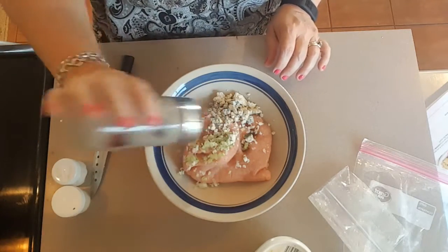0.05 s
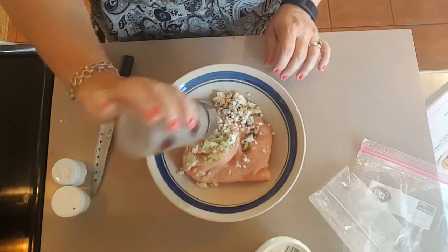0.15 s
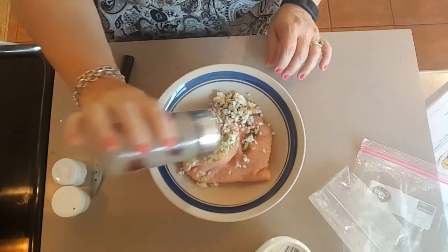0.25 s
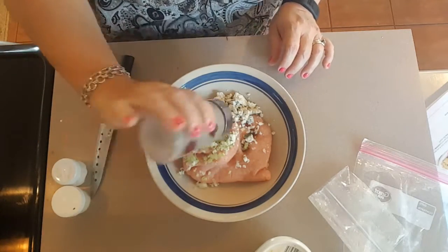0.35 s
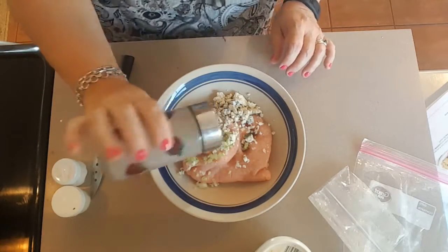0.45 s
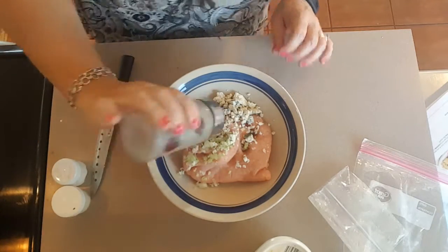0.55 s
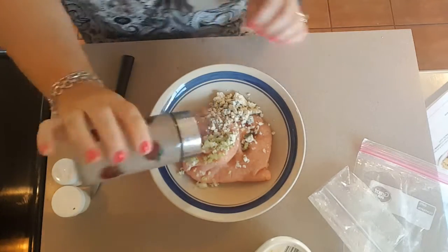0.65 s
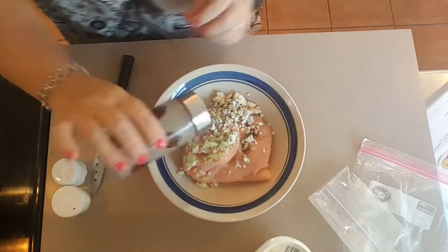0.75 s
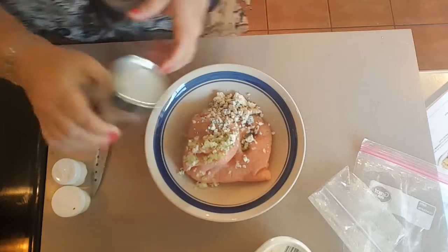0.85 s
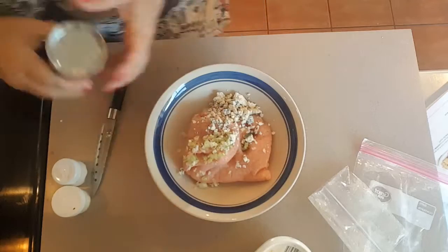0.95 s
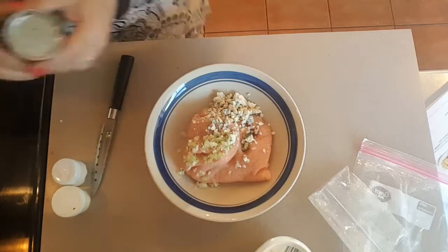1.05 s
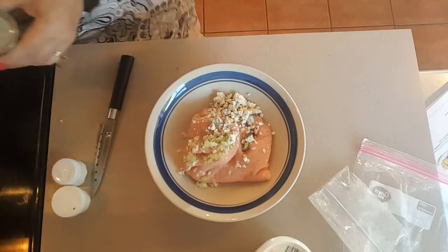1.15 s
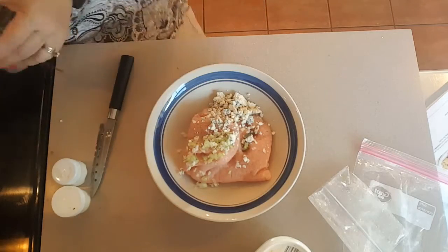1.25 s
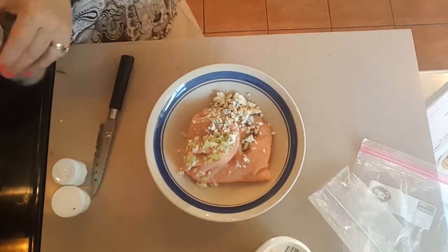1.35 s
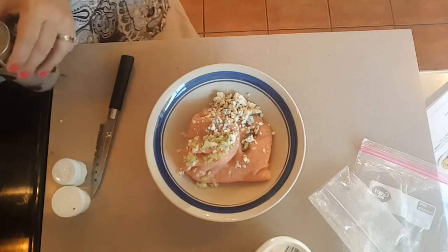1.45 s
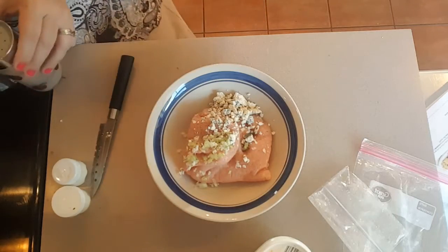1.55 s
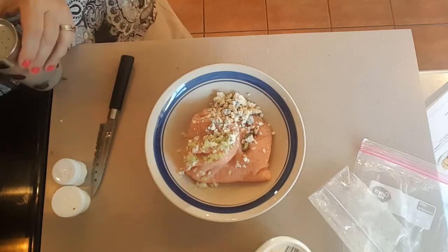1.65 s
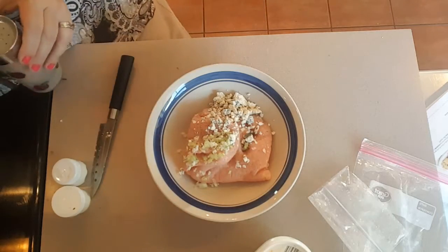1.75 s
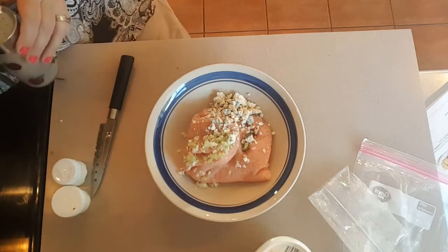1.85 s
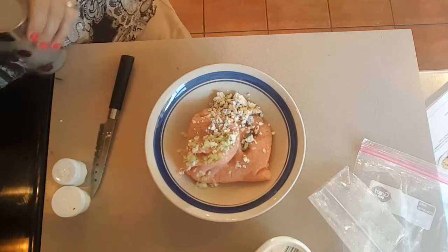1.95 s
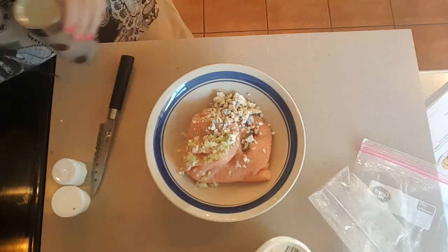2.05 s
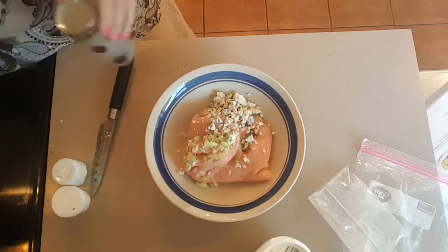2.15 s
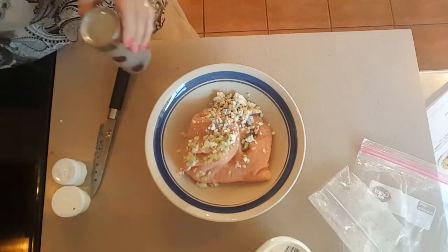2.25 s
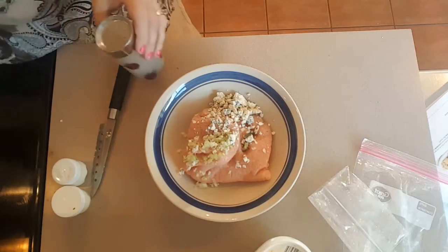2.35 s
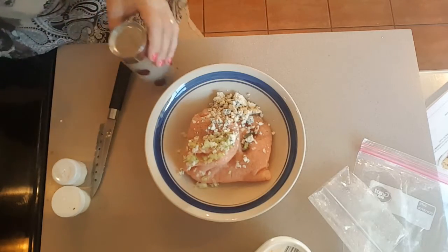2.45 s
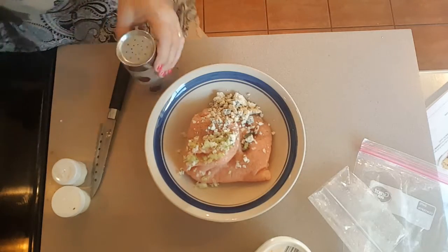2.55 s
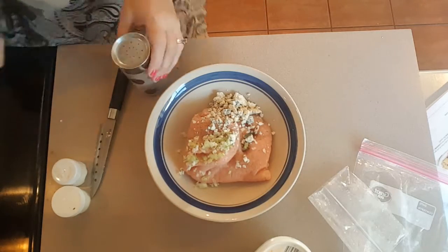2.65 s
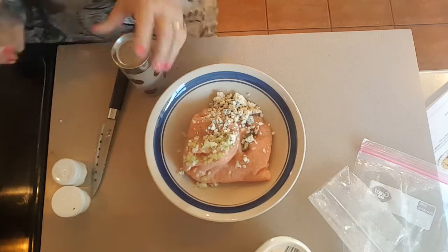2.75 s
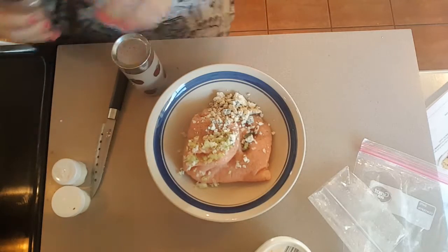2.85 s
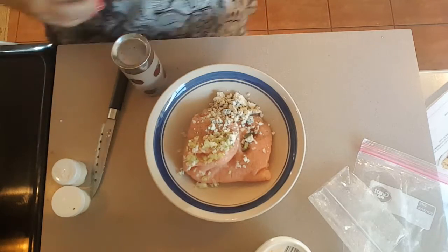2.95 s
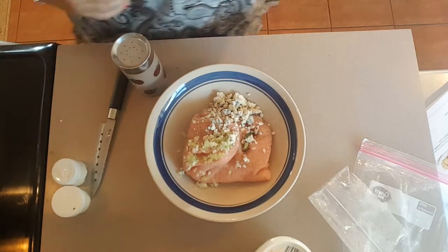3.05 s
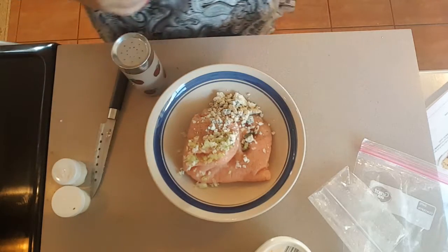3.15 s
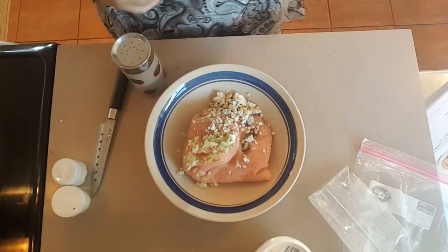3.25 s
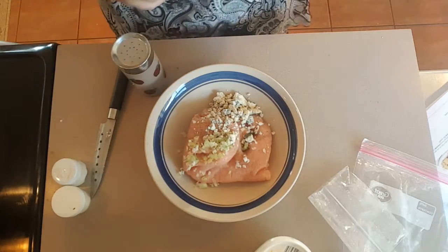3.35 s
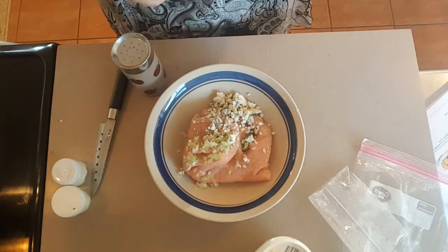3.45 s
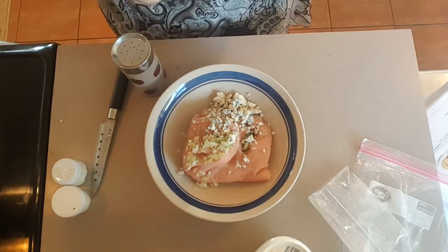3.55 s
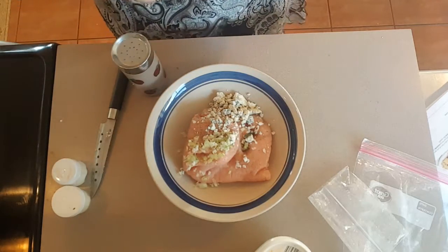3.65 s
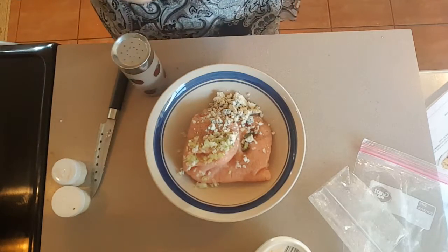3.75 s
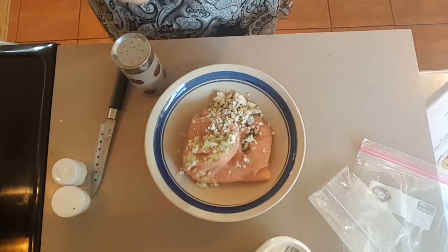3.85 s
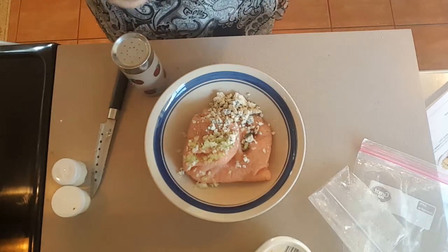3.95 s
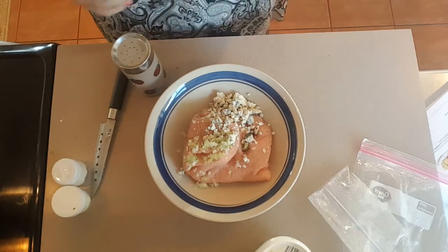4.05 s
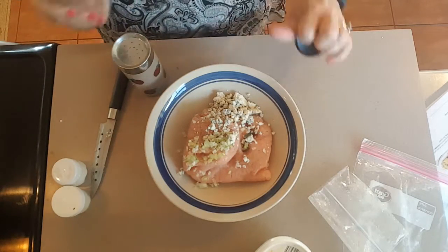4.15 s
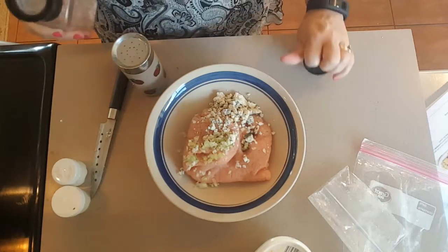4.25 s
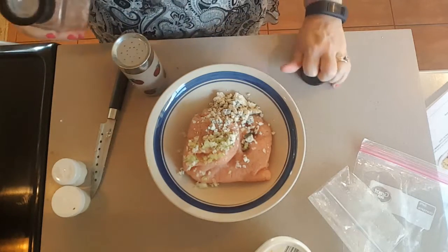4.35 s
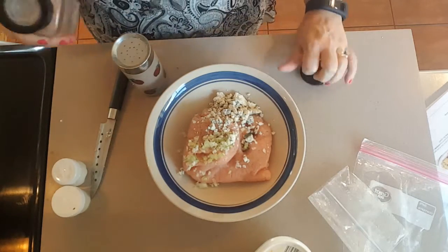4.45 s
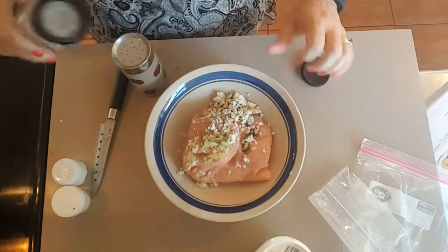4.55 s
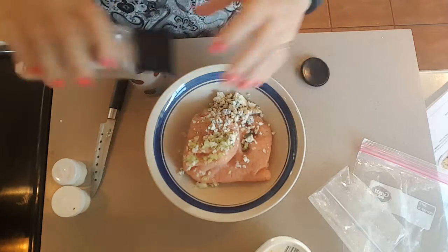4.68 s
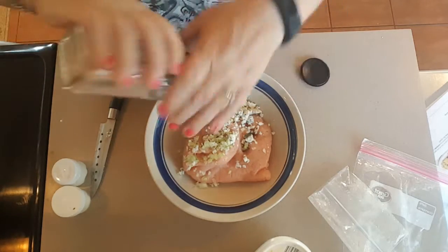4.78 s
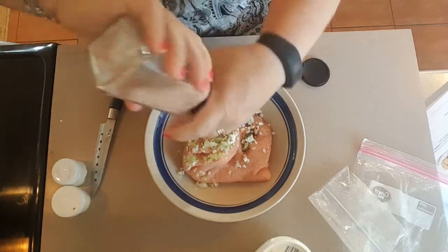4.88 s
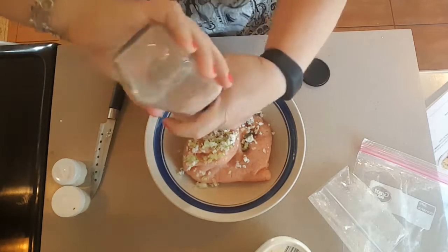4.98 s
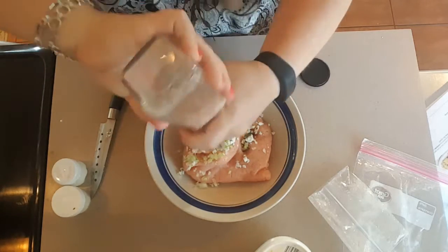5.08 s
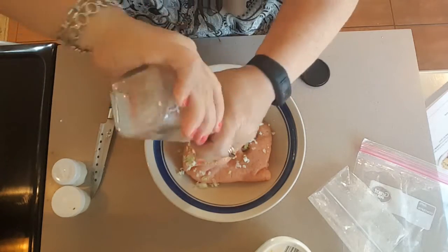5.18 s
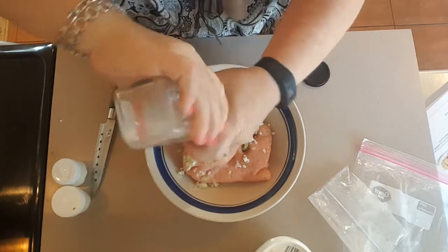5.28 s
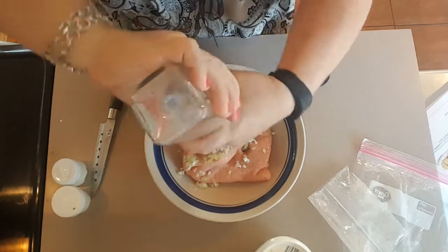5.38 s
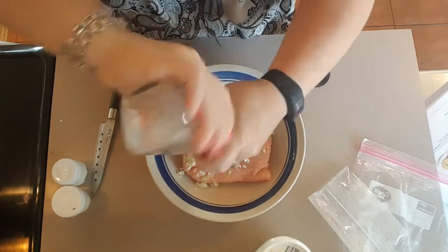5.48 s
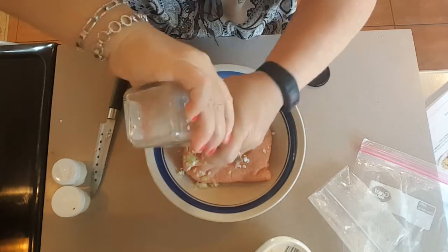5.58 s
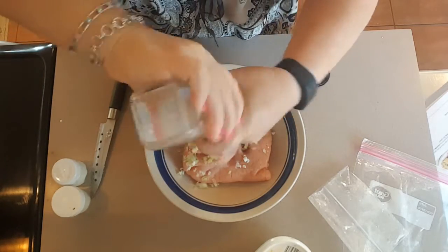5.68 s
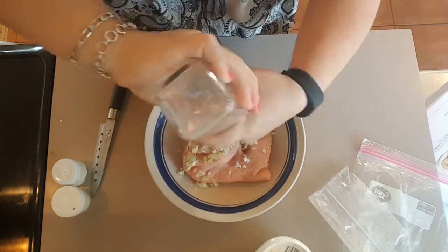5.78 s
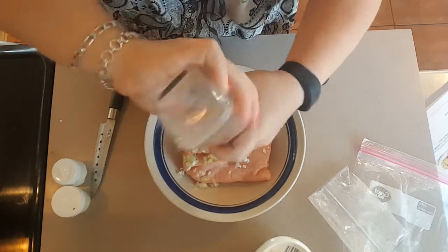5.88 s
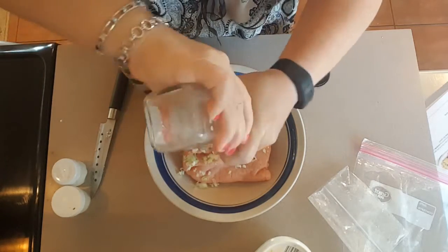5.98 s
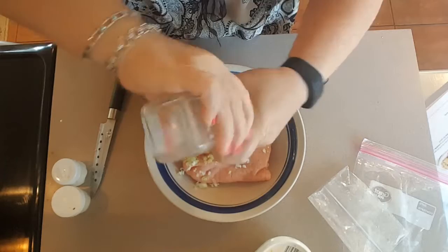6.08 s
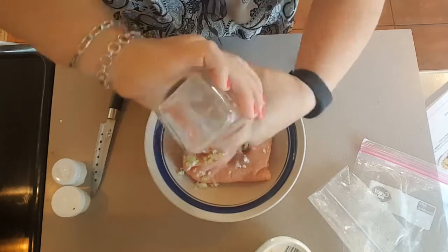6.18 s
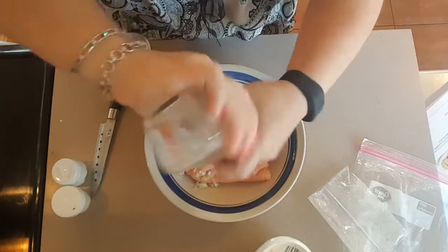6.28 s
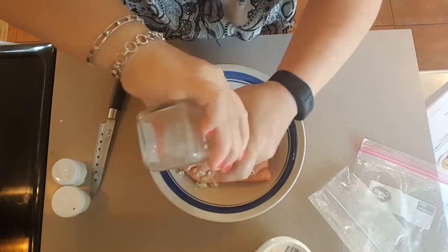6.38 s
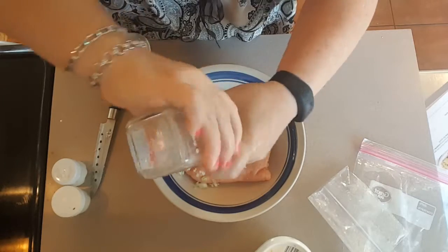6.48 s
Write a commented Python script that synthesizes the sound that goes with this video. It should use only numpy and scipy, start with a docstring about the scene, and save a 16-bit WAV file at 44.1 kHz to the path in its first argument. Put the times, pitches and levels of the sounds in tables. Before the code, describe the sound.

A steady low ventilation rumble with thin hiss fills a slightly echoing kitchen, heard from a phone above the counter. In the first second a bracelet jingles very faintly four times. At 1.9 seconds a cupboard door rubs open, and at 2.6 it bangs shut loudly with a short rattle. A shaker is set down with soft thuds at 2.8. Amid faint finger rubs, a plastic cap snaps off a glass spice grinder with a hollow pop at 3.4, with smaller clicks and a bump near 3.8. The cap clacks onto the counter at 4.3 and wobbles to rest by 4.9. The bracelet jingles, grains slide briefly down the jar, and a low hum swells and fades. From 5.1 to about 6.4 seconds the grinder is twisted back and forth in seven short, gritty crunches, with sharp cracks as grains burst.

```python
"""A kitchen counter, heard by a phone above it, over a steady ventilation rumble.
First a bracelet jingles faintly as a shaker is used. A cupboard door rubs open and bangs shut,
and the shaker is set down. Next the cap snaps off a glass spice grinder, lands on the counter
and wobbles to rest. The jar is turned over and its grains slide down, while a low hum comes and goes.
Last, the grinder is twisted to and fro over a bowl, and its teeth crack the grains."""
import sys
import numpy as np
from scipy import signal
from scipy.fft import rfft, irfft
from scipy.io import wavfile

SR = 44100
rng = np.random.default_rng(int(sys.argv[2]) if len(sys.argv) > 2 else 0)


def unload_audio(sound):
    """Save the sound as a 16-bit wav file, at the path given as the first command line argument."""
    columns = np.transpose(np.atleast_2d(sound))
    # keep every value between -1 and 1, then stretch to whole-number steps
    steps = np.round(np.clip(columns, -1, 1) * 32767)
    wavfile.write(sys.argv[1], SR, steps.astype(np.int16))


N = 287752
TIME = np.arange(N) / SR
FFT_SIZE = 360000  # longer than the sound, to leave room for echoes
HZ = np.arange(FFT_SIZE // 2 + 1) * SR / FFT_SIZE

# Levels are relative: scene() sets the final mix.
# Tone curves: how strong a sound is from bass to treble. Each row: frequency in Hz, level in dB.
AIR_TONE = [(15, -71.5), (25, -46), (43, -9.5), (64, 6), (80, -8.5), (114, 2.5), (293, -20), (516, -13),
            (887, -21.5), (2050, -24), (3160, -28), (3430, -28.5), (4140, -31.5), (13200, -40.5),
            (16000, -36)]
RUB_TONE = [(200, -31), (900, -2.5), (2000, 0), (3500, -5), (8000, -11.5), (16000, -25)]
BUMP_TONE = [(40, -33), (130, 9.5), (220, -1.5), (330, -9), (550, -23), (1000, -13), (4000, -60)]
HINGE_TONE = [(200, 3.5), (1100, 15), (2000, 8), (3000, 0.5), (5000, -10), (7000, -15.5), (16000, -24)]
DOOR_TONE = [(40, -49), (85, -1.5), (135, 10), (200, -1.5), (290, -16), (500, 1.5), (830, 1), (1100, -1),
             (1500, -12.5), (2200, -25), (4400, -36), (6000, -46.5), (9500, -50.5), (11000, -64),
             (16000, -62.5)]
SNAP_TONE = [(300, -46.5), (1100, -13.5), (1650, -9.5), (2020, 4.5), (2450, 0.5), (2850, -9.5), (3200, -2),
             (3800, -25), (6500, -31.5), (16000, -45)]
CAP_CLACK_TONE = [(300, -15.5), (1200, -10), (1900, 1), (2450, -0.5), (3050, 0), (3400, -25), (3900, -12.5),
                  (4500, -12.5), (5100, -25), (6000, -22.5), (7000, -18), (8500, -31), (16000, -31)]
SLIDE_TONE = [(200, -26.5), (600, -9.5), (1450, -16.5), (1800, 0.5), (2100, -3.5), (2550, -9), (3300, -5),
              (4400, -9.5), (6000, 0), (7000, -6.5), (7700, -0.5), (9000, -5.5), (13000, -8), (16000, -12)]
GRINDER_TONE = [(100, -16.5), (210, -14), (310, -22), (520, -8.5), (800, -19), (1100, -6.5), (1500, -7.5),
                (2400, -4.5), (3600, -8.5), (5000, -6), (7500, -6), (9500, -9.5), (10500, -13.5),
                (16000, -17.5)]

# The notes a thing rings at when hit. Each row: frequency in Hz, width in Hz, level in dB.
BRACELET_NOTES = [(3240, 110, -5), (3520, 200, 8), (4460, 260, -2), (5640, 290, 3), (6230, 220, 0),
                  (7530, 640, -1), (8900, 700, -9), (10700, 610, -12), (13300, 820, -8.5),
                  (15100, 900, -14.5)]
CAP_AIR_NOTES = [(194, 82, -1.5), (484, 110, 5.5), (620, 340, -20)]  # the air under the cap
CAP_KNOCK_NOTES = [(570, 220, 2), (885, 440, 0.5), (1330, 72, -6)]
CAP_RIM_NOTES = [(2600, 30, -6), (2950, 40, 3), (3130, 50, 1), (4440, 100, 12.5), (6600, 20, 4)]
GRINDER_NOTES = [(1046, 250, -8), (1870, 113, 4.5), (2900, 290, -14), (4600, 350, -5.5), (5490, 280, 3)]
# The door panel's notes. Each row: frequency in Hz, level in dB, seconds to fade by 60 dB.
PANEL_NOTES = [(141.8, 16, 0.32), (165.3, 6.5, 0.36), (189.8, 1, 0.9), (417, 2.5, 0.93), (470, -8, 0.65),
               (550, -5, 0.64), (533, -11, .55), (608, -5, .55), (712, -22.5, 0.88), (818, -10.5, .45),
               (919, -31, .45), (1031, -32, 0.58), (1084, 13.5, 0.47), (1160, -28.5, 0.52)]

# Sounds that swell and fade. Each row: start in seconds, length in seconds, level in dB.
HUM_SWELLS = [(4.87, 0.12, -54)]
FINGER_RUBS = [(2.955, 0.037, -66.5), (3.05, 0.37, -72.5), (3.36, 0.097, -69.5), (3.56, .19, -65.5),
               (3.9, 0.05, -66), (4.18, 0.052, -71.5)]  # the grip shifts on shaker, jar and cap
JINGLES = [(.175, 0.02, -70), (.38, 0.023, -69), (.595, 0.017, -70), (.755, .035, -72),
           (4.665, 0.033, -55.5), (4.72, .05, -49.5), (4.77, 0.09, -47), (4.885, 0.026, -48)]  # four shakes, then the jar is turned over
HINGE_RUBS = [(1.882, 0.043, -41)]
GRAIN_SLIDES = [(4.893, 0.03, -30)]

# Short hits. Each row: start in seconds, level in dB, contact time in seconds.
LINK_TICKS = [(3.106, -53.5, 0.0016), (3.128, -54.5, .003), (3.177, -63.5, .002), (3.723, -57, 0.0023),
              (3.753, -56.5, 0.0016), (3.771, -55.5, 0.0019)]  # bracelet links
SOFT_BUMPS = [(2.779, -29, 0.0024), (2.808, -28, 0.0023), (2.822, -38, 0.0035), (3.723, -35, 0.00096),
              (3.768, -45.5, 0.0027)]  # shaker and jar
DOOR_HITS = [(1.889, -38.5, 0.015), (1.905, -38, 0.017), (1.919, -37.5, 0.0058), (2.554, -11.5, 0.0018),
             (2.559, -22, 0.0055), (2.574, -22.5, 0.0012), (2.592, -21, 0.0028), (2.679, -28.5, 0.0017)]  # pulled open, slammed, rattling in its frame
CAP_LANDING = [(4.347, -24.5, 0.0022), (4.351, -27, 0.0016)]
# The cap is pulled off. Each row: the same three, then its hollow pop in dB relative to the snap.
CAP_SNAPS = [(3.4269, -24, 0.00065, 5), (3.7237, -36, 0.0043, -6), (3.753, -56, 0.0023, -3),
             (3.769, -42.5, 0.0025, -21), (3.8838, -32, 0.0021, -22.5)]

# Grinder twists, hard forward and lightly back in turn.
# Each row: start in seconds, length in seconds, level in dB, treble change in dB.
GRINDER_TWISTS = [(5.14, 0.048, -30.5, 1), (5.339, 0.048, -31.5, -12), (5.513, 0.042, -28, -7),
                  (5.71, 0.031, -48, -13), (5.928, .09, -42.5, 5.5), (6.134, 0.061, -39, -15),
                  (6.306, 0.059, -31.5, -5)]
# The biggest grains burst. Each row: start in seconds, level in dB.
GRAIN_CRACKS = [(5.1419, -28), (5.1696, -24), (5.186, -26), (5.2109, -24), (5.5204, -26.5), (5.536, -24.5),
                (5.743, -42.5), (5.943, -33.5), (5.9755, -26), (6.012, -27), (6.326, -24), (6.337, -23.5),
                (6.3518, -22)]

# The kitchen's echo. Each row: frequency in Hz, seconds to fade by 60 dB.
ROOM_FADE = [(100, 0.19), (400, 0.62), (1000, 0.47), (2500, 0.52), (6000, 0.6), (10000, 0.45),
             (16000, 0.33)]
# How the phone's two microphones differ. Each row: frequency in Hz, left minus right in dB.
MIC_BALANCE = [(100, -1.5), (500, -4.5), (1200, 1.5), (2400, 3), (3100, -5), (3700, -6), (4500, -8),
               (6000, -4.5), (7500, -2), (11000, -3), (13000, -7), (16000, -4)]


def gain(db):
    """Turn decibels into a number to multiply by."""
    return 10 ** (np.asarray(db) / 20)


def read_curve(points, hz):
    """Read between (Hz, value) points, giving each octave equal space."""
    freqs, values = np.transpose(points)
    return np.interp(np.log(hz + 1), np.log(freqs), values)


def keep_power(response):
    """Scale a filter so that white noise comes out as strong as it went in."""
    return response / np.sqrt(np.mean(abs(response) ** 2))


def through(sound, response):
    """Pass a sound through a filter, given as its response at each frequency."""
    return irfft(rfft(sound, FFT_SIZE) * response)[..., :N]


def tone(points):
    """A filter that follows a tone curve."""
    cepstrum = irfft(np.log(gain(read_curve(points, HZ))))
    cepstrum[FFT_SIZE // 2:] = 0  # so nothing sounds before the hit that causes it
    return keep_power(np.exp(2 * rfft(cepstrum)))


def ring(notes):
    """A filter that rings at the given notes; narrow ones ring longer."""
    return keep_power(sum(gain(db) * width * 1j * HZ / (hz ** 2 - HZ ** 2 + 1j * width * HZ)
                          for hz, width, db in notes))


def ringing_tone(points, notes, notes_db):
    """A tone curve on which a few ringing notes stand out."""
    return keep_power(tone(points) * (1 + gain(notes_db) * ring(notes)))


def cushion(hz):
    """A slightly soft contact loses the treble above this frequency."""
    return 1 / (1 + np.sqrt(2) * 1j * HZ / hz - (HZ / hz) ** 2)


def crackle(samples, per_s, spread_db):
    """Tiny random clicks of very uneven size, with an average power of one."""
    sizes = gain(spread_db * np.minimum(rng.exponential(size=samples), 4))
    clicks = rng.standard_normal(samples) * sizes * (rng.random(samples) < per_s / SR)
    return clicks / np.sqrt(np.mean(clicks ** 2) + 1e-12)


def swells(rows, attack_s, release_s):
    """Loudness over time: each row builds up, then dies away once its length is over."""
    return sum(gain(db) * np.clip((TIME - start) / attack_s, 0, 1)
               * np.exp(-np.maximum(TIME - start - length, 0) / release_s)
               for start, length, db in rows)


def hits(rows, chatter):
    """Each hit is one sharp push, then a dying chatter of smaller ones."""
    spread_s = 0.004  # a hit's level is its energy spread over this time
    force, t = np.zeros(N + SR), TIME[:SR // 20]
    for start, db, contact_s in rows:
        push = crackle(len(t), per_s=16000, spread_db=0.63) * np.exp(-t / contact_s)
        push *= chatter / np.linalg.norm(push)
        push[0] += 1
        at = int(start * SR)
        force[at:at + len(t)] += push / np.linalg.norm(push) * gain(db) * np.sqrt(spread_s * SR)
    return force[:N]


def air():
    """Ventilation rumbles, alike on both sides, under thin hiss; a low hum comes and goes."""
    level_db, hum_hz = -59, 84.0
    alike = 1 / (1 + (HZ / 500) ** 2)
    curve = keep_power(gain(read_curve(AIR_TONE, HZ)))
    rumble = through(rng.standard_normal(N), curve * np.sqrt(alike))
    hiss = through(rng.standard_normal((2, N)), curve * np.sqrt(2 * (1 - alike)))
    hum = np.sqrt(2) * np.sin(2 * np.pi * hum_hz * TIME)
    return gain(level_db) * (rumble + hiss) + hum * swells(HUM_SWELLS, attack_s=0.14, release_s=0.49)


def wall_echo():
    """The kitchen's echo: each octave fades at its own rate, and the bass is alike on both sides."""
    t, tail = TIME[:SR], 0
    edges = np.append(0, SR / 2 / 2. ** np.arange(8)[::-1])
    hz = np.arange(SR // 2 + 1)
    own, shared = rfft(rng.standard_normal((2, SR))), rfft(rng.standard_normal(SR))
    alike = 1 / (1 + (hz / 600) ** 4)
    noise = np.sqrt(alike) * shared + np.sqrt(1 - alike) * own
    for low, high in zip(edges, edges[1:]):
        band = irfft(noise * (hz >= low) * (hz < high), SR)
        tail = tail + band * 1000. ** (-t / read_curve(ROOM_FADE, (low + high) / 2))
    fade_in = 1 - np.exp(-t / 0.0018)
    return keep_power(rfft(tail * fade_in, FFT_SIZE))


def near_path(echo_db, fade_s):
    """Sound reaches each microphone directly, then bounces off bowl, counter and cupboards."""
    t = TIME[:SR // 10]
    centres = np.geomspace(2600, 15000, num=6) * rng.uniform(.8, 1.2, (2, 6))
    poles = [np.prod([hz ** 2 - HZ ** 2 + 1j * HZ * hz / 10 for hz in mic], axis=0) for mic in centres]
    direct = np.conj(poles) / poles  # bending round the phone delays the treble a little
    echoes = rng.standard_normal((2, len(t))) * np.exp(-t / fade_s) * (t > .001)
    bass_cut = 1j * HZ / (700 + 1j * HZ)  # these surfaces are too small to throw back bass
    return keep_power(direct + gain(echo_db) * keep_power(rfft(echoes, FFT_SIZE)) * bass_cut)


def fingers():
    """Skin rubs over glass and plastic in tiny slips."""
    slips = crackle(N, per_s=7000, spread_db=1.5)
    return through(slips * swells(FINGER_RUBS, attack_s=0.009, release_s=0.039), tone(RUB_TONE))


def bracelet():
    """Links jostle and tick as the wrist moves."""
    jostle = crackle(N, per_s=5000, spread_db=4.1) * swells(JINGLES, attack_s=0.011, release_s=0.026)
    return through(jostle + hits(LINK_TICKS, chatter=1.0), ring(BRACELET_NOTES))


def bumps():
    """The shaker and the jar bump with soft, low thuds."""
    return through(hits(SOFT_BUMPS, chatter=0.55), tone(BUMP_TONE))


def cupboard():
    """The door rubs open on its hinge, then slams and bounces; its panel rings on."""
    knocks = through(hits(DOOR_HITS, chatter=1.0), tone(DOOR_TONE))
    rub = crackle(N, per_s=1500, spread_db=2.4) * swells(HINGE_RUBS, attack_s=0.018, release_s=.005)
    hinge = through(rub, tone(HINGE_TONE))
    notes = [(hz, np.log(1000) / np.pi / fade_s, db) for hz, db, fade_s in PANEL_NOTES]
    panel = through(hits(DOOR_HITS, chatter=0), ring(notes) * cushion(hz=1400))
    return knocks + hinge, panel


def cap_off():
    """The plastic cap snaps over its ridge, and the air under it pops."""
    snap = hits([row[:3] for row in CAP_SNAPS], chatter=0.81)
    pop = hits([(s, db + pop_db, contact_s) for s, db, contact_s, pop_db in CAP_SNAPS], chatter=0.62)
    return through(snap, tone(SNAP_TONE)) + through(pop, ring(CAP_AIR_NOTES) * cushion(hz=1290))


def wobble(count):
    """The hits of a settling cap: ever closer and softer, fading mostly near the end."""
    rows, start = [], 4.501
    first_gap_s, gap_ratio = .086, .86
    first_db, loss_db = -39, 15
    for k in range(count):
        db = first_db - loss_db * (k / (count - 1)) ** 4
        contact_s = 0.0017 * 1.5 ** k
        edge_touch = (start - 0.0076, db - 1.5, contact_s)  # the edge lands just before each knock
        rows += [edge_touch, (start, db, contact_s)]
        start += first_gap_s * gap_ratio ** k
    return rows


def cap_down():
    """The cap lands with a flat clack that rings its rim, then wobbles to rest with dull knocks."""
    knocks = hits(wobble(count=7), chatter=1.9) + gain(-14) * hits(CAP_LANDING, chatter=1.0)
    clack = hits(CAP_LANDING, chatter=0.87)
    return (through(knocks, ring(CAP_KNOCK_NOTES) * cushion(hz=5760)),
            through(clack, ringing_tone(CAP_CLACK_TONE, CAP_RIM_NOTES, notes_db=-12.5)))


def sliding_grains():
    """Grains tumble down the glass as the jar is turned over."""
    ticks = crackle(N, per_s=6000, spread_db=3.3)
    return through(ticks * swells(GRAIN_SLIDES, attack_s=0.012, release_s=0.02), tone(SLIDE_TONE))


def catching_grains(per_s, crumble_s, depth):
    """The load on the grinder's teeth jumps as a small grain catches and falls as it crumbles."""
    jumps = rng.random(N) < per_s / SR
    load = signal.lfilter([1], [1, -np.exp(-1 / (crumble_s * SR))], jumps)
    return np.sqrt(1 - depth + depth * load / load.mean())


def grinder(spot_count):
    """Twists drag grit through the teeth; grains burst and ring the housing. One sound per spot."""
    grit = crackle(N, per_s=5000, spread_db=4.1)
    grit *= catching_grains(per_s=164, crumble_s=0.0046, depth=0.8)
    dull = signal.sosfilt(signal.butter(1, 5000, fs=SR, output="sos"), grit)
    treble = grit - dull
    burst_s = 0.0027
    force = hits([(start, db, burst_s) for start, db in GRAIN_CRACKS], chatter=3.4)
    for start, length, db, treble_db in GRINDER_TWISTS:
        twist = swells([(start, length, db)], attack_s=0.004, release_s=0.0048)
        force += twist * (dull + gain(treble_db) * treble)
    # each tiny push happens at one random spot on the teeth
    at_spot = rng.integers(spot_count, size=N) == np.arange(spot_count)[:, None]
    return through(force * at_spot, ringing_tone(GRINDER_TONE, GRINDER_NOTES, notes_db=-10.5))


def scene():
    """Mix the sounds, heard from three spots near the phone and by way of the kitchen walls."""
    walls = wall_echo()
    spots = [near_path(echo_db=-2, fade_s=.006) for _ in range(3)]

    def place(sound, spot, db, room_db):
        """Put a sound at one spot and add the room's echo."""
        return gain(db) * through(sound, spot + gain(room_db) * walls)

    door, panel = cupboard()
    cap_knocks, cap_clack = cap_down()
    thuds = bumps()
    grinding = sum(place(sound, spot, db=1.5, room_db=-7)
                   for sound, spot in zip(grinder(len(spots)), spots))
    return (place(door, spots[0], db=1.5, room_db=2.0) + gain(-2.5) * panel
            + place(thuds, spots[0], db=-4.5, room_db=-6)
            + place(bracelet(), spots[1], db=3, room_db=-7.5)
            + place(fingers(), spots[1], db=0.5, room_db=0)
            + place(cap_off(), spots[1], db=-3.0, room_db=-12)
            + place(cap_knocks, spots[2], db=3.0, room_db=-2.5)
            + place(cap_clack, spots[2], db=-1, room_db=-2.5)
            + place(sliding_grains(), spots[2], db=-1, room_db=-6.0)
            + grinding + air())


def record(dry):
    """Each of the phone's two microphones has its own tone; the highest treble is cut steeply."""
    lean_db = read_curve(MIC_BALANCE, HZ) / 2
    stereo = through(dry, gain([lean_db, -lean_db]))
    top_hz = 15750
    return signal.sosfilt(signal.ellip(10, .2, 70, top_hz, fs=SR, output="sos"), stereo)


dry = scene()
out = record(dry)
unload_audio(out)
```